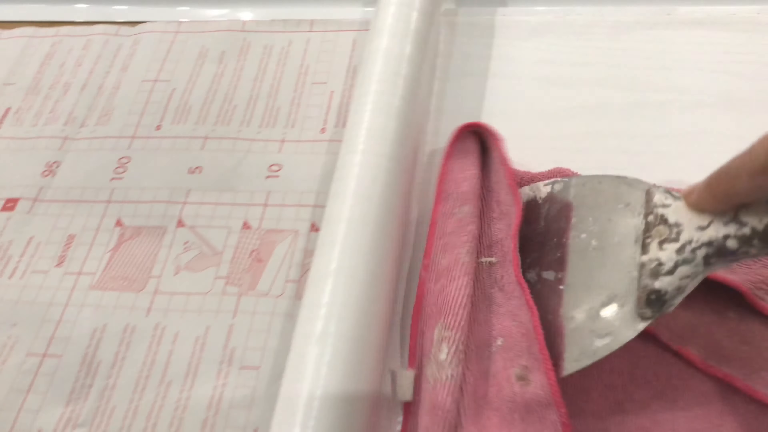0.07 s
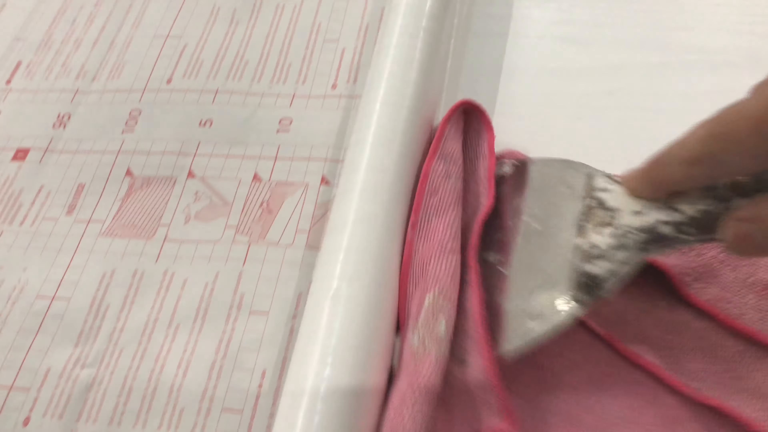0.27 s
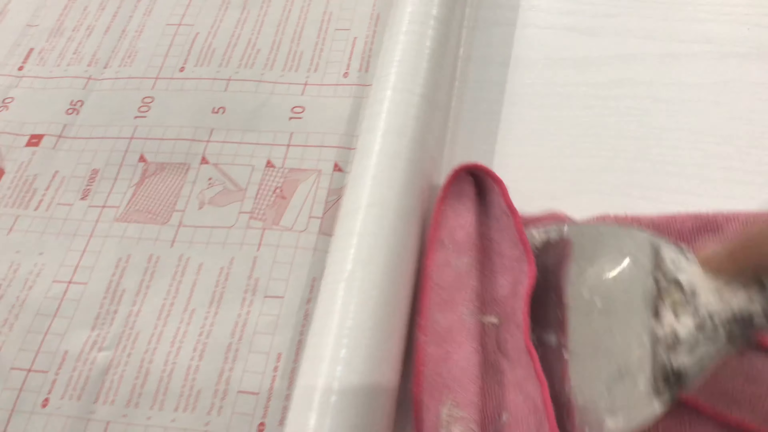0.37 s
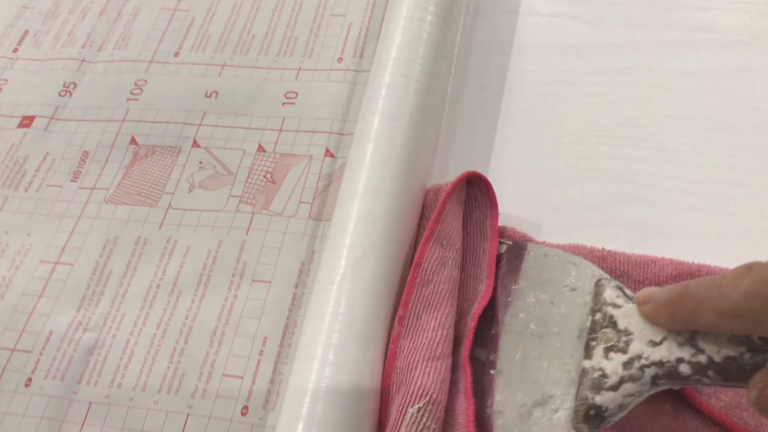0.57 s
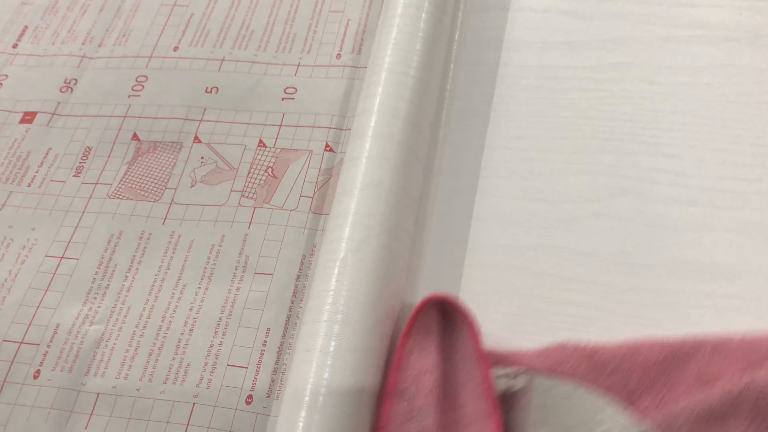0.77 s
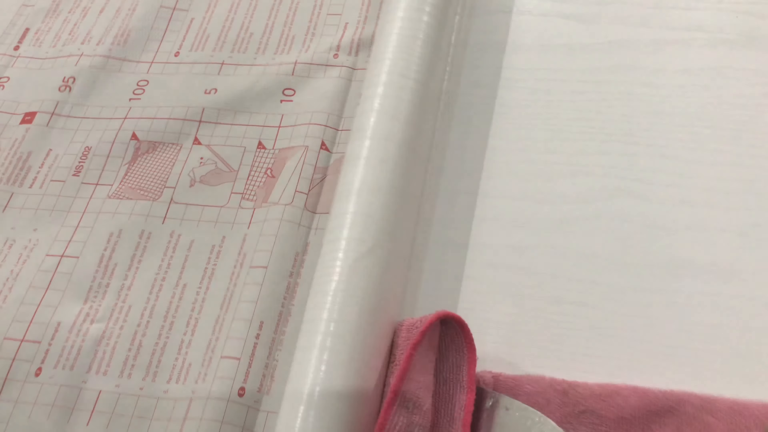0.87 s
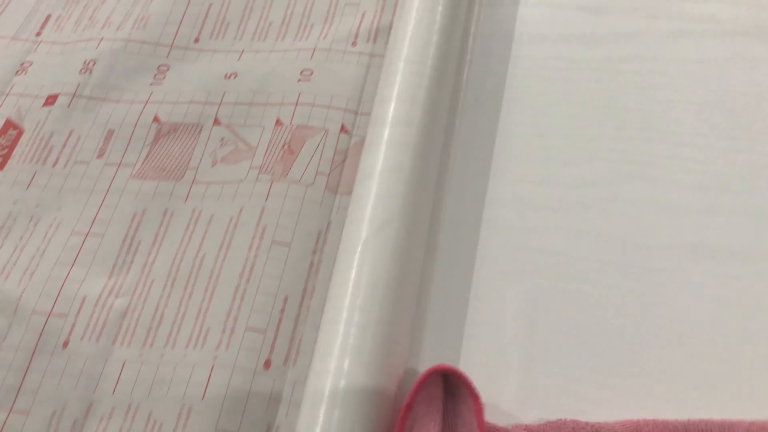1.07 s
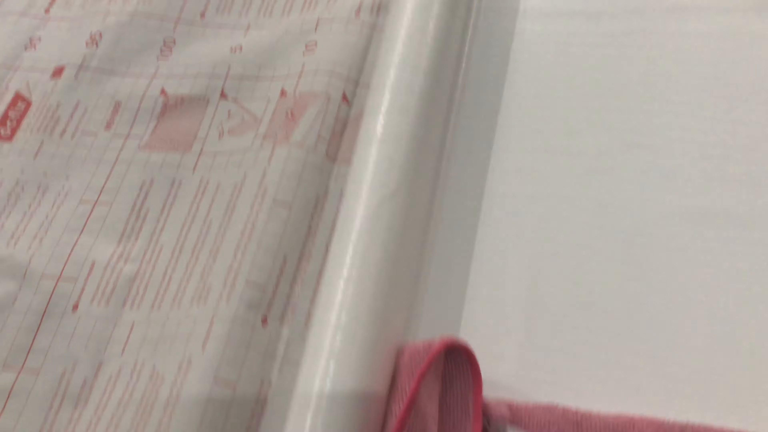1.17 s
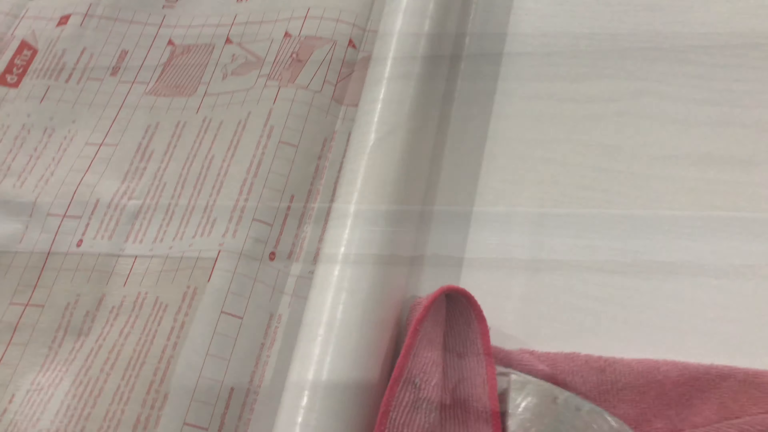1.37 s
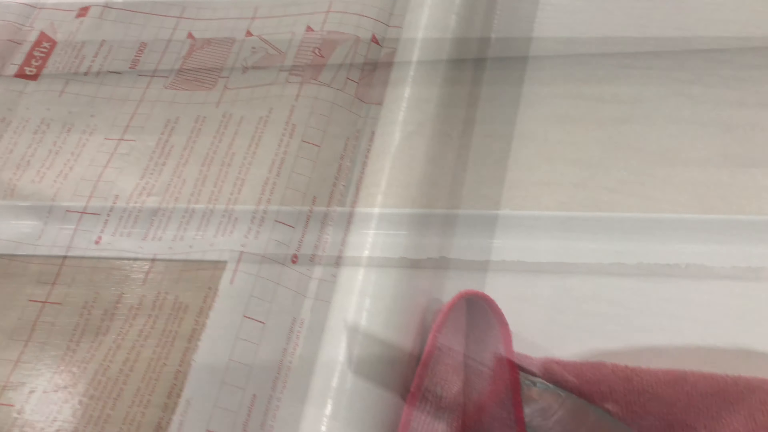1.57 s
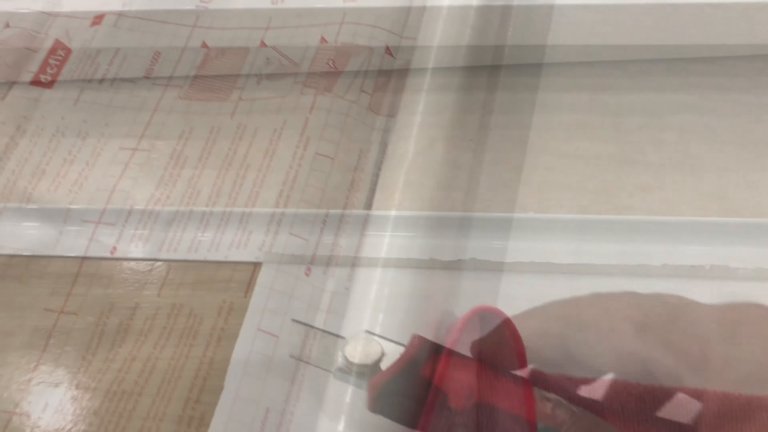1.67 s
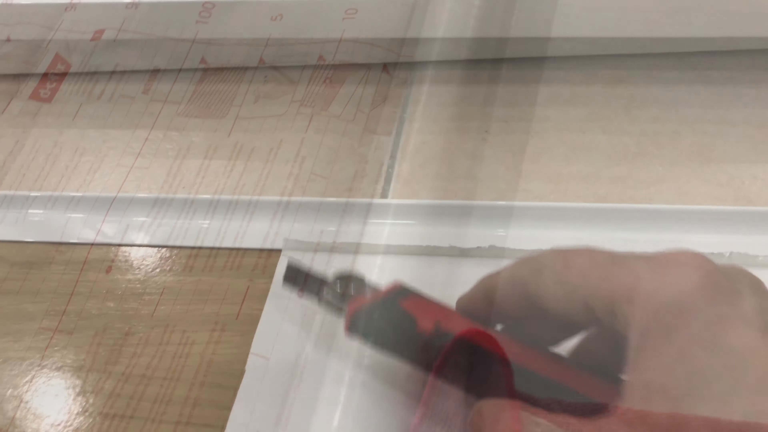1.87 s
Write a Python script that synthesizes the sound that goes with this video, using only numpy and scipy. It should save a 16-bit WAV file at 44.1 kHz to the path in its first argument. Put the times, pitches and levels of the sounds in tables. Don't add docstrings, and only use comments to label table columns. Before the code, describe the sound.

Crinkling self-adhesive film snaps and thumps on a board, with soft cloth rubbing between strokes

```python
import sys
import numpy as np
from scipy import signal
from scipy.fft import rfft, irfft
from scipy.io import wavfile
from scipy.ndimage import uniform_filter1d

SR = 44100
rng = np.random.default_rng(int(sys.argv[2]) if len(sys.argv) > 2 else 0)


def magnitude_from_level(level_db):
    exponent = np.asarray(level_db, float) / 20
    return 10 ** exponent


def wrap_up_sound(samples):
    columns = np.atleast_2d(samples).T
    tamed = np.clip(columns, -1, 1)
    steps = np.round(tamed * 32767).astype(np.int16)
    wavfile.write(sys.argv[1], SR, steps)


N = 83790


def level(x, db):
    return x * magnitude_from_level(db) / np.sqrt(np.mean(x ** 2))


def colour(x, points):
    hz, db = np.array(points).T
    f = np.fft.rfftfreq(4096, 1 / SR)
    cepstrum = irfft(np.interp(np.log(f + 1), np.log(hz), db) * np.log(10) / 20)
    cepstrum[1:2048] *= 2
    cepstrum[2049:] = 0
    response = irfft(np.exp(rfft(cepstrum)))
    return signal.fftconvolve(x, response)[:len(x)]


def band(x, hz, width):
    b, a = signal.iirpeak(min(hz, .45 * SR), hz / width, fs=SR)
    return signal.lfilter(b, a, x)


def walk(rate):
    hold = int(SR / rate)
    steps = np.repeat(rng.standard_normal(N // hold + 1), hold)
    return 1.3 * uniform_filter1d(uniform_filter1d(steps, hold), hold)[:N]


def glide(x, t, s, hz, share):
    centre = np.log(np.interp(t, s, hz))
    out = 0
    for f in min(hz) * 1.1 ** np.arange(8):
        nearness = np.exp(-((centre - np.log(f)) / 0.062) ** 2)
        out = out + nearness * band(band(x, f, share * f), f, share * f)
    return level(out, 0)


def grains(rate, spread_db):
    out = 0
    for hz in 250 * 2 ** np.arange(0, 6.1, .5):
        happens = rng.random(N) < rate / SR
        size_db = spread_db * np.minimum(rng.exponential(size=N), 3)
        kick, noise = rng.standard_normal((2, N))
        clicks = happens * kick * magnitude_from_level(size_db) + .2 * noise
        out = out + band(clicks, hz, .4 * hz)
    return colour(out, [(250, 0), (16000, 0)])


def swings(t, table):
    out = 0
    for s, db, hz, t60 in table:
        u = np.maximum(t - s, 0)
        out = out + magnitude_from_level(db - 60 * u / t60) * np.minimum(u * hz, 1) * np.sin(2 * np.pi * hz * u)
    return out


def room(t):
    # pitch in Hz, level in dB per Hz.
    air_tone = [(20, -34.5), (40, 7), (270, 0.5), (949, -4), (1860, -7), (2320, -9), (10200, -23),
                (13500, -16), (16000, -31.5)]
    # time in seconds, level in dB.
    fade = [(1.25, -1.5), (1.4, -5), (1.46, -9), (1.6, -14), (1.64, -14.5), (1.75, -17), (1.83, -16.5),
            (1.87, -4.5)]
    air = level(colour(rng.standard_normal(N), air_tone), -58) * magnitude_from_level(walk(6))
    rumble_hz = 73
    low_noise = band(band(rng.standard_normal(N), rumble_hz, 70), rumble_hz, 90)
    return level(low_noise, -71) + air * magnitude_from_level(np.interp(t, *np.array(fade).T))


def table_rocking(t):
    # start in seconds, level in dB, pitch in Hz, time to die by 60 dB in seconds.
    rocks = [(.205, -40, 53, 0.13), (0.213, -37, 94.4, 0.22), (0.384, -63, 43.4, 0.067),
             (0.527, -30.5, 455, 0.04), (0.539, -29.5, 54.4, 0.077), (.866, -35, 484, 0.046),
             (1.55, -58, 900, 0.13), (.59, -50, 44, 0.12), (0.868, -37, 59, 0.066), (0.899, -52, 97.4, 0.4),
             (1.152, -42, 71, 0.11), (1.24, -48, 71, 0.2), (1.877, -55.5, 180, .1)]
    return swings(t, rocks)


def knife(t):
    start_s, length_s, pitch_hz = 1.62, 0.15, 3730
    swell = np.sin(np.pi * np.clip((t - start_s) / length_s, 0, 1))
    scrape = band(band(rng.standard_normal(N), pitch_hz, 700), pitch_hz, 900)
    return swell * magnitude_from_level(2.3 * walk(60.7)) * level(scrape, -75.5)


def groan(t):
    # time in seconds, level in dB, pitch in Hz.
    path = [(0, -66, 223.3), (0.07, -61, 278.5), (0.098, -62, 247.8), (0.169, -56, 319.1),
            (0.259, -52.5, 188.5), (.36, -62.5, 262.2), (0.471, -59.5, 254.4), (.58, -54, 195),
            (.66, -63, 246.8), (0.828, -57, 275), (0.898, -61, 206.2), (1.042, -64.5, 180),
            (1.108, -62, 238.4), (1.23, -57, 243), (1.37, -60.5, 236.2), (1.479, -74, 207),
            (1.84, -81.5, 216), (1.875, -59.5, 251)]
    s, db, hz = np.array(path).T
    width_hz = 140
    turn = np.exp(2j * np.pi * np.cumsum(np.interp(t, s, hz)) / SR)
    wobble = walk(width_hz) + 1j * walk(width_hz)
    return magnitude_from_level(np.interp(t, s, db) + 3.1 * walk(15)) * level((turn * wobble).real, 0)


def cloth(t):
    # time in seconds, body level in dB, hiss level in dB, resonance in Hz.
    rub = [(0, -50.5, -55.5, 910), (.065, -54.5, -59, 910), (0.089, -80, -60, 1212),
           (.15, -61.5, -55.5, 1200), (0.289, -49.5, -52.5, 940), (0.369, -55, -57.5, 1350),
           (0.418, -64, -61, 1200), (0.502, -61, -57.5, 1097), (.62, -58.5, -54, 1000),
           (0.714, -50, -57.5, 1250), (0.779, -62, -56.5, 1210), (0.969, -60, -54, 1146),
           (1.04, -51.5, -63, 1300), (1.099, -62.5, -58, 1300), (1.301, -58.5, -60, 1327),
           (1.5, -71, -61.5, 980), (1.58, -61.5, -70, 930), (1.66, -75, -64, 950)]
    # pitch in Hz, level in dB per Hz.
    body_tone = [(150, -24.5), (400, -5.5), (1200, 0), (2500, -6), (5000, -20.5), (9000, -24.5),
                 (16000, -39.5)]
    # pitch in Hz, level in dB per Hz.
    hiss_tone = [(1000, -23), (3500, -3), (7000, -8), (10500, -9.5), (13000, -9.5), (16000, -6.5)]
    # time in seconds, hiss change in dB.
    lift = [(1.405, 2.5), (1.42, -9), (1.53, -1), (1.55, 4), (1.6, 2), (1.62, 0), (1.7, -1.5), (1.8, -10),
            (1.85, -16), (1.87, -5.5)]
    s, body_db, hiss_db, hz = np.array(rub).T
    drag = grains(3000, 3.2)
    body = level(colour(drag, body_tone), 0) + magnitude_from_level(-11.5) * glide(drag, t, s, hz, .12)
    hiss = level(colour(rng.standard_normal(N), hiss_tone), 0)
    body = body * magnitude_from_level(np.interp(t, s, body_db) + 2.73 * walk(40))
    hiss = hiss * magnitude_from_level(np.interp(t, s, hiss_db) + 0.66 * walk(37))
    return body + hiss * magnitude_from_level(np.interp(t, *np.array(lift).T))


def board(t):
    # start in seconds, level in dB, length of the push in seconds.
    thumps = [(0.2046, -17, 0.00067), (.527, -23.5, 0.0015), (.866, -37.5, 0.0015), (.875, -31.5, 0.00021),
              (1.065, -44, 0.00032), (1.096, -45.5, 0.00071), (1.159, -33, .0015), (1.248, -46, 0.00026),
              (1.398, -43, 0.00083), (1.889, -46.5, 0.001)]
    # pitch in Hz, level in dB, time to die by 60 dB in seconds.
    modes = [(220, -20.5, .08), (423, -7, .05), (550, -8, 0.04), (614, -17.5, 0.035), (1020, -3.5, 0.033)]
    force = 0
    for s, db, push in thumps:
        press = np.sin(np.pi * np.clip((t - s) / push, 0, 1)) ** 2
        force = force + magnitude_from_level(db) * press / (push * SR / 2)
    ring = sum(magnitude_from_level(db - 60 * t / t60) * np.sin(2 * np.pi * hz * t) for hz, db, t60 in modes)
    return band(signal.fftconvolve(force, ring)[:N], 600, 970)


def film_rings(t):
    # start in seconds, level in dB, pitch in Hz, time to die by 60 dB in seconds.
    patches = [(.2049, -9, 6100, 0.0062), (0.2065, -28, 3250, .008), (.207, -29, 2970, 0.047),
               (.208, -21, 4050, 0.013), (.211, -20.5, 3230, .02), (.2065, -29, 567, 0.035),
               (.5372, -27.5, 3450, 0.011), (.545, -31, 3490, .03), (.547, -31, 3000, .03),
               (.529, -34.5, 614, 0.083), (.8665, -24, 2880, 0.013), (.868, -25, 3230, 0.049),
               (.8695, -27.5, 4390, 0.037), (.8685, -21.5, 6850, 0.015), (.875, -17, 5980, 0.0054),
               (.876, -35, 1030, 0.065), (.884, -31, 897, 0.029), (.8858, -29, 7700, 0.0056),
               (.899, -30.5, 3380, 0.028), (1.066, -30, 2580, 0.019), (1.155, -34, 2020, 0.03),
               (1.168, -36, 4920, 0.023), (1.171, -34.5, 2150, 0.034), (1.182, -36, 4370, 0.021),
               (1.191, -39, 3060, 0.023), (1.2468, -21.5, 2310, 0.01), (1.2472, -29.5, 3180, 0.012),
               (1.247, -26, 4630, 0.013), (1.247, -33, 5650, 0.012), (1.249, -32, 1610, 0.022),
               (1.289, -26.5, 3300, 0.01), (1.289, -38, 3860, 0.01), (1.3987, -38, 1754, 0.019),
               (1.402, -35.5, 2660, 0.016), (1.4, -53, 6450, 0.017), (1.407, -45, 1500, 0.023),
               (1.428, -45, 1770, 0.028), (1.43, -47, 3183, 0.022)]
    return swings(t, patches)


def snaps():
    # start in seconds, peak in dB, centre in Hz, time to die by 60 dB in seconds.
    creases = [(.124, -44, 3760, .015), (.1995, -35, 2000, .02), (.2047, -2, 3300, .002),
               (.259, -35, 1500, .012), (.372, -36, 1270, .015), (.5105, -35, 2000, .025),
               (.5263, -20, 2800, .005), (.5293, -15, 2600, .003), (.5296, -23, 7000, .004),
               (.5372, -25, 6500, .015), (.5675, -29, 6500, .012), (.817, -46, 1940, .015),
               (.8665, -24, 3300, .028), (.869, -25, 6800, .015), (.86, -30, 2000, .015),
               (.8752, -13, 9500, .004), (.8857, -13, 11500, .006), (1.0615, -41, 3500, .012),
               (1.0652, -31, 5000, .007), (1.0665, -31, 2600, .022), (1.0948, -36, 5500, .012),
               (1.097, -37, 2500, .02), (1.1325, -34, 2800, .018), (1.2462, -18, 7000, .006),
               (1.2464, -30, 11400, .005), (1.247, -26, 3000, .02), (1.2605, -35, 3000, .012),
               (1.2885, -36, 7500, .008), (1.289, -36, 3500, .016), (1.391, -40, 2200, .02),
               (1.3987, -37, 3800, .012), (1.399, -43, 1100, .02), (1.4255, -38, 4800, .01),
               (1.427, -41, 2500, .03), (1.4548, -46, 1500, .025), (1.455, -48, 4400, .012),
               (1.856, -58, 1670, .02), (1.856, -57, 11000, .01)]
    length = 4096
    out, u = np.zeros(N + length), np.arange(length) / SR
    for s, db, hz, t60 in creases:
        rattle = rng.standard_normal(length) * magnitude_from_level(-60 * u / t60) * np.minimum(u / t60 * 30, 1)
        click = (u == 0) * 0.0086 / t60
        kick = 0.58 * rattle - click
        own = band(band(band(kick, hz, .8 * hz), hz, 1.9 * hz), hz, 1.9 * hz)
        wide = band(band(kick, 5300, 9700), 4500, 10000)
        y = own + magnitude_from_level(-8) * 0.0031 / t60 * wide
        top_hz = max(9800, 1.4 * hz)
        y = signal.sosfilt(signal.butter(6, top_hz, fs=SR, output="sos"), y)
        start = int(s * SR)
        out[start:start + length] += y * magnitude_from_level(db) / np.abs(y).max()
    return out[:N]


def crinkle(t):
    # start, attack and hold in seconds, level in dB, time to die by 60 dB in seconds.
    strokes = [(0.194, 0.012, 0.0034, -28, 0.14), (0.524, 0.0029, 0.027, -35.5, 0.16),
               (0.853, 0.01, 0.013, -32, 0.17), (1.141, 0.018, 0.034, -40.5, 0.055),
               (1.241, 0.0027, 0.05, -49.5, 0.063), (1.378, 0.0043, 0.047, -62, 0.11),
               (1.508, 0.04, 0.05, -64, 0.12), (1.863, 0.02, 0.042, -69.5, 0.16)]
    # pitch in Hz, level in dB per Hz.
    film_tone = [(200, -31.5), (380, 0), (600, 2.5), (2000, 1), (3250, 0), (6500, -4), (10500, -10),
                 (16000, -10.5)]
    tail_db, tail_stretch = -19, 6.3
    swell = 0
    for s, attack, hold, db, t60 in strokes:
        rise = np.clip((t - s) / attack, 0, 1) ** 2
        fall_db = np.maximum(t - s - attack - hold, 0) * -60 / t60
        swell = swell + magnitude_from_level(db) * rise * (magnitude_from_level(fall_db) + magnitude_from_level(tail_db + fall_db / tail_stretch))
    creases = level(colour(grains(1500, 2.5), film_tone), 0)
    return swell * magnitude_from_level(walk(149.45)) * creases


def scene():
    t = np.arange(N) / SR
    near = crinkle(t) + snaps() + film_rings(t) + board(t)
    echo_t60_s, echo_db = 0.43, -20
    tail = band(rng.standard_normal(N), 1600, 3500) * magnitude_from_level(-60 * t / echo_t60_s) * (t > .004)
    echo = signal.fftconvolve(near, tail / np.sqrt(np.sum(tail ** 2)))[:N]
    around = table_rocking(t) + cloth(t) + groan(t) + room(t) + knife(t)
    return (near + magnitude_from_level(echo_db) * echo + around)[None]


def low_pass(x):
    return signal.sosfilt(signal.butter(12, 16850, fs=SR, output="sos"), x)


def record(dry):
    dry = signal.sosfilt(signal.ellip(10, .2, 80, 15800, fs=SR, output="sos"), dry)
    mix = dry - .42 * band(dry, 10400, 640)
    return low_pass(mix)


dry = scene()
out = record(dry)
wrap_up_sound(out)
```